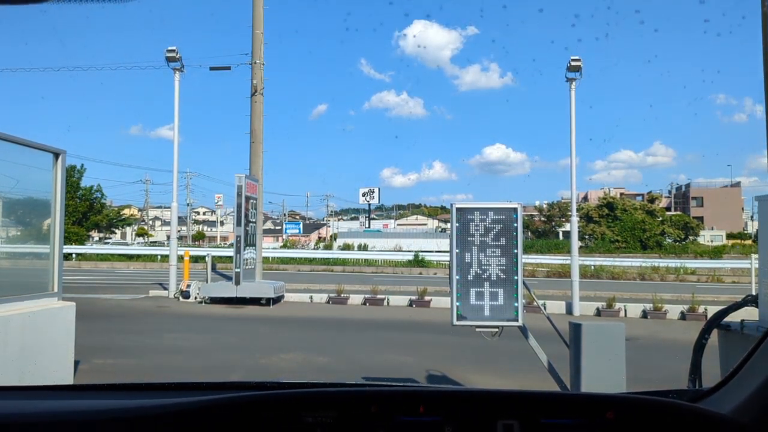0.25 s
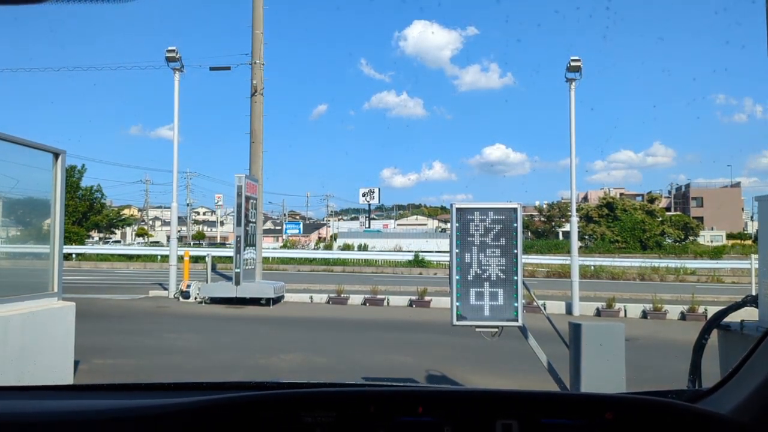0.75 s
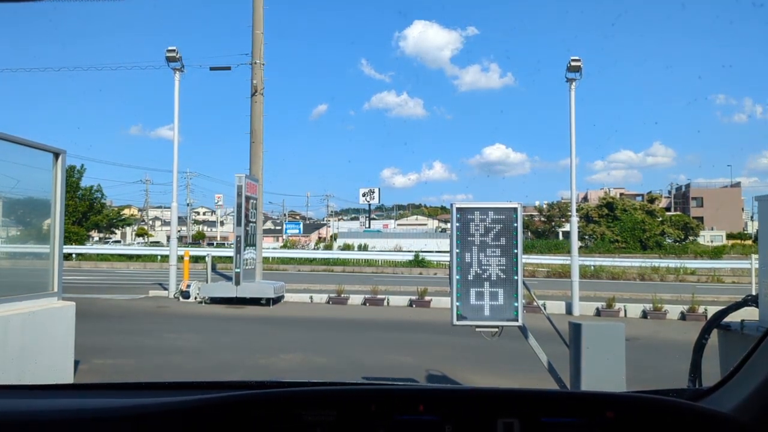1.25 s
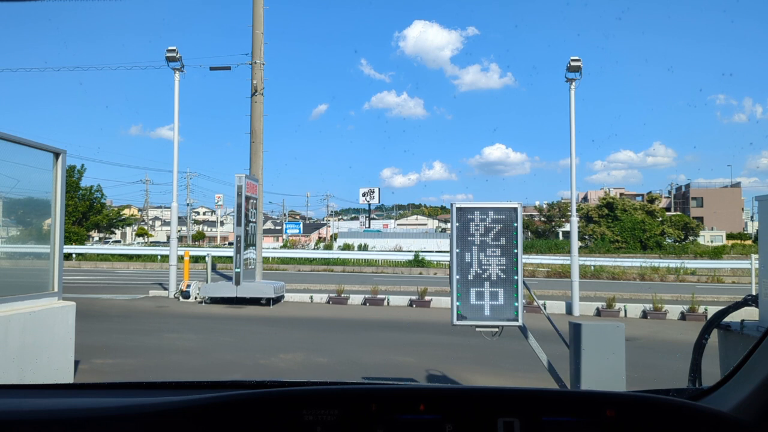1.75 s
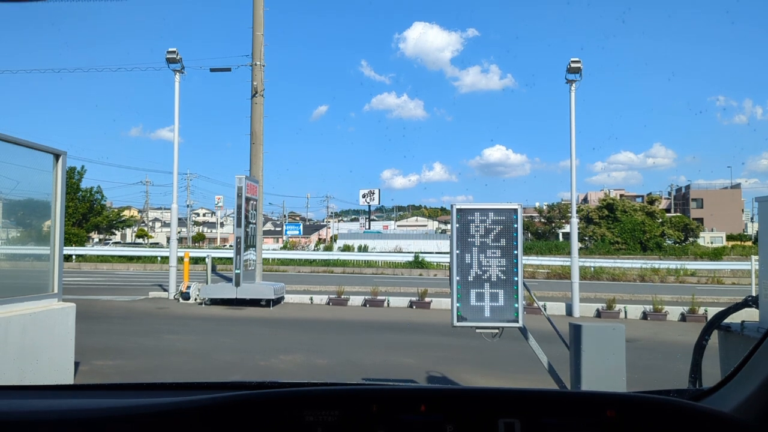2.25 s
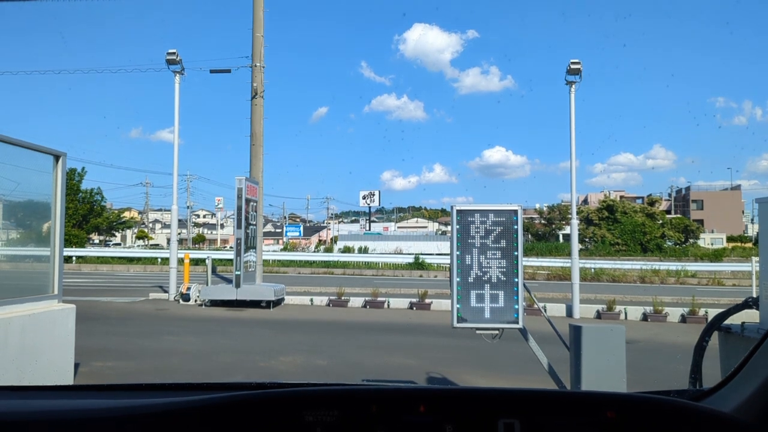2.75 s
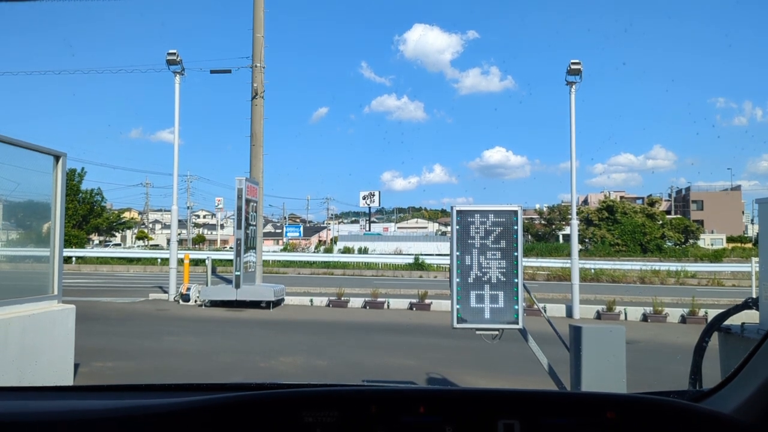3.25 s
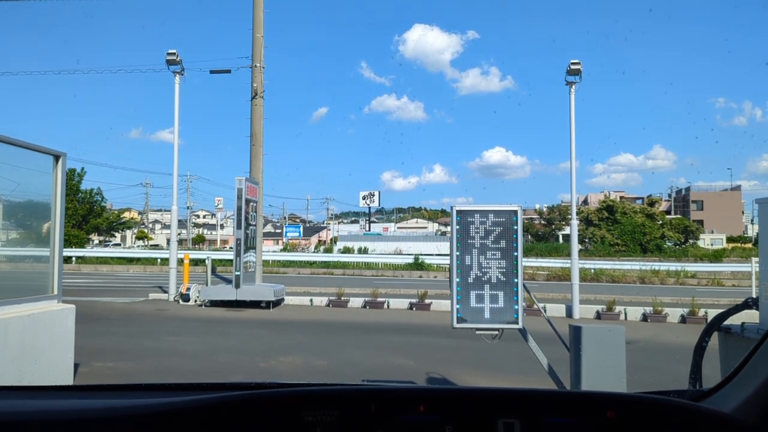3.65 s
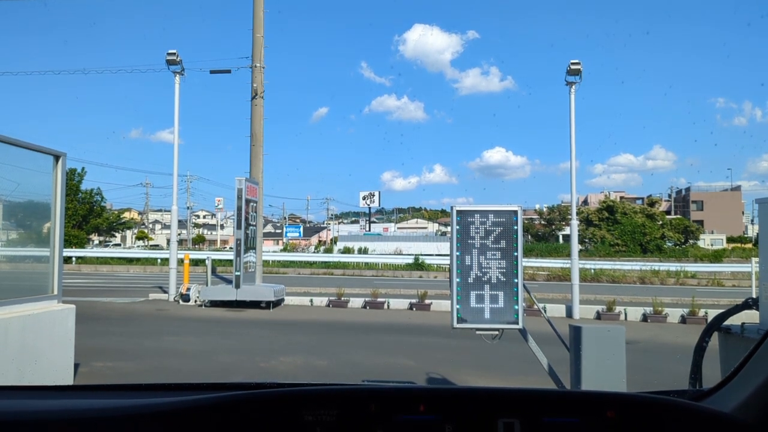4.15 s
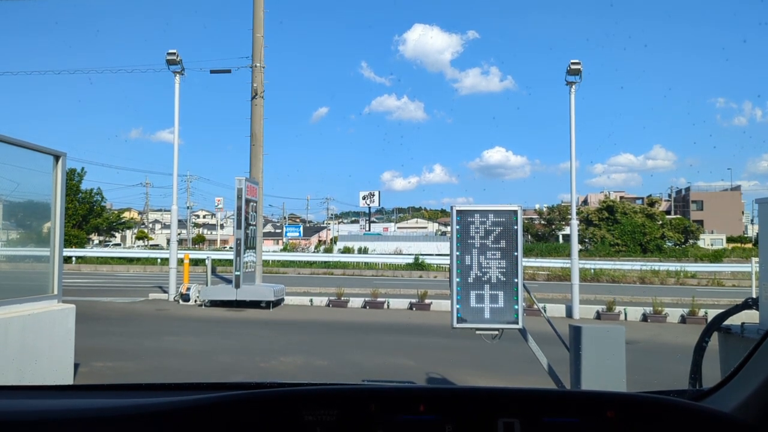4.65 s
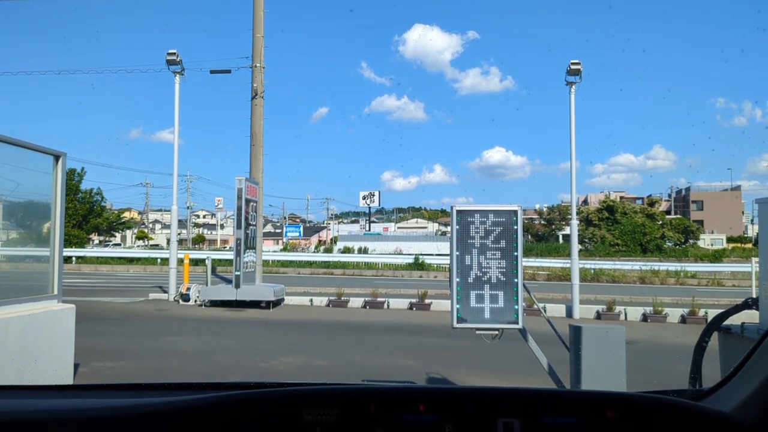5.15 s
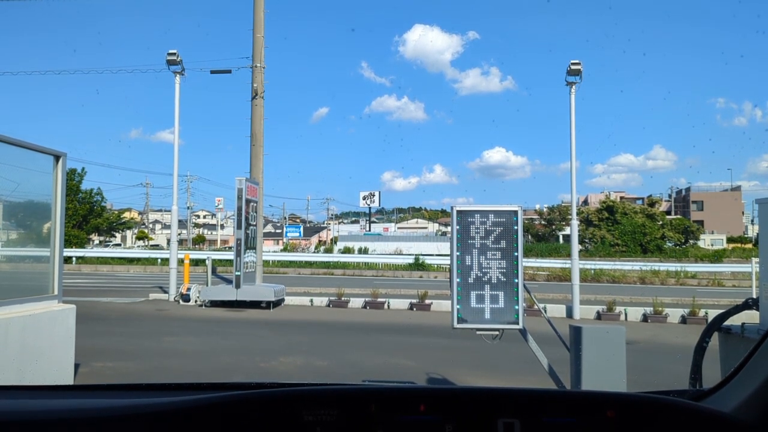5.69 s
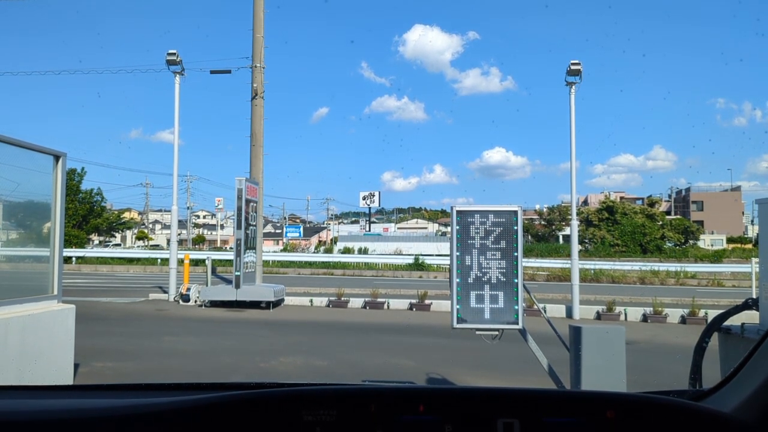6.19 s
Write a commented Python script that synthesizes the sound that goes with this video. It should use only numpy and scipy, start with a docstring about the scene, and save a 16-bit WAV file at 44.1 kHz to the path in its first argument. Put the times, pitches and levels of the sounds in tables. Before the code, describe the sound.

From inside a closed car, the blowers of a car-wash dryer roar without pause for about 6.4 seconds. The sound is mostly low: deep cabin rumble and boomy panel resonance, unsteady with tiny gusts, swells and dips. The deepest part strengthens over the first few seconds, while a hollow mid drone grows slowly throughout. A much quieter hiss of air leaks through glass and seals, its treble toward the right. Faint fan whistles are buried in the drone, and a thin mid-pitched tone wavers in and out, clearest around 0.6 and 5.8-6.1 s. Tiny high ticks of water drops on glass, mostly right, are frequent in the first two seconds, then sparse, with isolated ones near 2.9, 3.4 and 6.1. At about 5.5 s a small slug of water spatters sharply on the glass. The roar continues to the end, in enclosed stereo cabin sound.

```python
"""Car-wash dryer from inside the car

Blower jets shake the panels of a closed car: noise through cabin resonances gives boom and drone.
A thin hiss leaks in, mostly on the right; fan whistles and a wavering tone lie in the drone.
Blown drops tick on the glass as short decaying sines with a crack; a slug of water bursts as wide noise.
"""
import sys
import numpy as np
from scipy import signal
from scipy.fft import rfft, irfft, next_fast_len
from scipy.io import wavfile
from scipy.ndimage import uniform_filter1d, map_coordinates

SR = 44100
rng = np.random.default_rng(int(sys.argv[2]) if len(sys.argv) > 2 else 0)


def generate_wav(sig):
    """Save sig (samples, or channels by samples) to the path in sys.argv[1] as 16-bit PCM at SR."""
    pcm = np.round(np.clip(np.atleast_2d(sig).T, -1, 1) * 32767).astype(np.int16)
    wavfile.write(sys.argv[1], SR, pcm)


N = 283386


def jets():
    """Blower jets: panel-shaken cabin resonances plus the hiss that leaks in."""
    drone_db = glide(first=-41, last=-36, tau_s=15)
    return rumble() + drone(drone_db) + across(drone_db) + hiss()


# lowest air resonances of the cabin: (centre [Hz], width [Hz], relative level [dB], left-right [dB])
DEEP_MODES = [(57.5, 12, -8.5, 2.5), (75, 14, -7.5, 0), (97.9, 21, -1, -3), (107.6, 12.3, 2, -2)]
# roof and door panels: (centre [Hz], width [Hz], relative level [dB], left-right [dB])
BOOM_MODES = [(128.7, 20.2, -0.5, -1), (149.8, 14, -2, -0.5), (166.7, 14.1, -1, -3.5), (197.4, 12, -11, -4)]
# brief swells and dips: (time [s], level [dB], 1/e half-length [s])
LUMPS = [(.785, -9, .016), (1.096, -9, .016), (1.16, 3, .025), (1.336, 5, .025), (2.03, 6, .028),
         (2.078, -8, .014), (2.5, -7, .015), (2.65, -7, .014), (2.69, 5, .025), (2.9, -5, .03),
         (3.13, 4, .03), (3.23, 4, .02), (3.57, -8, .016), (4.09, -7, .014), (4.329, -8, .018),
         (4.58, 4, .03), (4.9, -9, .03), (5.04, -4, .02), (5.11, 3, .03), (5.83, 3, .03)]
GUST_KNOTS_PER_S, GUST_DB = 9, 0.69
BOOM_SWELL_SHARE = 0.46  # share of each swell the panels follow; dips reach them whole


def rumble():
    """Cabin air and panel resonances; levels glide as the jets creep along the body, with random gusts."""
    t_s = np.arange(N) / SR
    lump_db = sum(db * np.exp(-((t_s - at_s) / length_s) ** 2) for at_s, db, length_s in LUMPS)
    panel_lump_db = np.minimum(lump_db, BOOM_SWELL_SHARE * lump_db)
    deep = unit(filtered(turbulence(patchy_db=0.26), resonant(DEEP_MODES, skirt=1.65)))
    boom = unit(filtered(turbulence(patchy_db=-0.55), resonant(BOOM_MODES, skirt=1.52)))
    deep_db = glide(first=-33.5, last=-29, tau_s=2.76) + lump_db + GUST_DB * wobble(GUST_KNOTS_PER_S)
    boom_db = glide(first=-32, last=-34.5, tau_s=1.6) + panel_lump_db + GUST_DB * wobble(GUST_KNOTS_PER_S)
    return amp(deep_db) * deep + amp(boom_db) * boom


# higher resonances: (centre [Hz], width [Hz], relative level [dB], left-right [dB])
DRONE_MODES = [(252, 26.7, -9, 9), (298, 34, -3.5, 0), (328.3, 15.7, -3.5, 3), (354.5, 48, -10.5, 2.5),
               (394, 28, -9.5, -0.5), (470.5, 30, -12.5, -0.5), (494, 13, -10, -0.5), (507.3, 26, -10.5, 2),
               (564, 56, -15.5, -1), (643.4, 28, -18, -5), (745, 68, -16, 1), (809, 20, -17.5, 2.5),
               (837, 25, -20.5, 2), (890, 68, -22.5, 2.5), (1015, 86, -27, 1), (1147, 140, -30, 1),
               (1360, 50, -29.5, 4.5), (1484, 50, -29.5, -1.5)]
LOW_DRONE_HZ = 370


def drone(level_db):
    """Higher cabin resonances; the lowest of them grow faster than the rest."""
    noise = unit(filtered(turbulence(patchy_db=0.72), resonant(DRONE_MODES, skirt=1.43)))
    low = filtered(noise, lambda hz: 1 / (1 + (hz / LOW_DRONE_HZ) ** 20))
    low_over_rest_db = glide(first=-2.7, last=5.9, tau_s=8.8)
    return amp(level_db) * (noise + (amp(low_over_rest_db) - 1) * low)


# side-to-side resonances: (centre [Hz], width [Hz], relative level [dB], left-right [dB])
ACROSS_MODES = [(278, 25, 14.5, 3.5), (604, 63, 6, -2), (680, 64, 8, -1), (791, 54, 9, -3.5),
                (828, 29, 6.5, -3.5), (958, 31, 7, -1), (1103, 43, 1, -0.5), (1100, 50, 0.5, 0.5),
                (1242, 76, 5, 0), (1290, 40, 1, 2), (1390, 35, -2, -1), (1400, 60, -5, 0),
                (1470, 20, -1, 1.5), (1566, 61, -0.5, -4.5), (1643, 80, 0, 1), (1690, 99, -11, -0.5)]
ACROSS_MEAN_DB, DRONE_SHARE = -49.5, 0.55


def across(drone_db):
    """Side-to-side resonances, opposite in sign at the microphones; the drone's panels shake them."""
    noise = unit(filtered(turbulence(patchy_db=-0.3, sign=-1.02), resonant(ACROSS_MODES, skirt=1.5)))
    return amp(ACROSS_MEAN_DB + DRONE_SHARE * (drone_db - drone_db.mean())) * noise


# jet noise through glass and seals: (frequency [Hz], relative density [dB per Hz])
HISS_COLOUR = [(1400, -8.5), (1800, -0.5), (2300, 0), (2800, -2.5), (3500, 0), (4300, -3), (5000, -4.5),
               (5600, -7.5), (6100, -12.5), (7200, -18), (8500, -27.5), (9500, -37.5), (11500, -54.5)]
# hiss balance: (frequency [Hz], left-right [dB])
HISS_SIDE = [(60, -1.5), (120, -2.0), (240, 0.5), (490, 0.5), (1000, 0.5), (2020, -1), (4080, -8),
             (8240, -13.5)]
# slow drift: (time [s], level [dB], level of the top over the rest [dB])
HISS_DRIFT = [(0, 1, 1.5), (.35, 0, 2.5), (.6, 0, 0.5), (.85, .5, 0.5), (1.5, 0, 0.5), (2, .5, 0),
              (2.6, 0.5, -3), (3.2, 1, -2.5), (3.8, 0, 0), (4.15, 1, -2.5), (4.5, 0.5, -1.5), (5.2, .5, 1),
              (5.8, 0.5, 0.5), (6.4, 0.5, 2)]
HISS_DB, HISS_LOW_HZ, TREBLE_HZ = -55.5, 1400, 6800
HISS_LEAD_S = 0.000403  # left microphone first
FLICKER_KNOTS_PER_S, FLICKER_DB = 7, 1.5


def hiss():
    """Jet noise leaking through glass and seals; its level drifts and its top flickers."""
    def leak(hz):
        lead = np.exp(1j * np.pi * HISS_LEAD_S * np.array([hz, -hz]))
        return amp(along(HISS_COLOUR, hz)) * sides(along(HISS_SIDE, hz)) * lead * (hz > HISS_LOW_HZ)

    noise = unit(filtered(turbulence(patchy_db=0.76), leak))
    top = filtered(noise, lambda hz: 1 - 1 / (1 + (hz / TREBLE_HZ) ** 10))
    at_s, *levels_db = np.transpose(HISS_DRIFT)
    drift_db, top_db = (np.interp(np.arange(N) / SR, at_s, db) for db in levels_db)
    top_gain = amp(top_db + FLICKER_DB * wobble(FLICKER_KNOTS_PER_S))
    return amp(HISS_DB + drift_db) * (noise + (top_gain - 1) * top)


# fan whistles: (centre [Hz], width [Hz], first level [dB], last level [dB], time constant [s])
WHISTLES = [(289, 9, -50, -41.5, 9), (326, 9, -62, -49, 4), (510, 10, -54, -54.5, 2), (650, 9, -60, -75, 6),
            (815, 9, -74, -56, 8)]


def whistles():
    """Fan whistles: narrow bands of noise, each gliding towards its own level."""
    out = np.zeros((2, N))
    for hz, width_hz, first_db, last_db, tau_s in WHISTLES:
        band = filtered(turbulence(patchy_db=0.5), resonant([(hz, width_hz, 0, 1)], skirt=1.8))
        out += amp(glide(first_db, last_db, tau_s)) * unit(band)
    return out


# tone comes and goes: (time [s], level [dB])
HUM_LEVEL = [(0, -60), (.6, -49.5), (1.6, -53.5), (2.2, -56.5), (2.7, -54.5), (3.3, -56), (3.8, -61),
             (4.5, -54.5), (5.2, -64.5), (5.75, -49.5), (6.15, -50.5), (6.4, -61)]
HUM_HZ, HUM_WANDER_HZ, HUM_WANDER_DB, HUM_KNOTS_PER_S = 422, 0.6, 0.62, 4
HUM_LEAD_RAD = 1.2  # left ahead of right


def hum():
    """Thin tone, probably fan blades: a sine of slowly wavering pitch and strength."""
    level_db = np.interp(np.arange(N) / SR, *np.transpose(HUM_LEVEL))
    hz = HUM_HZ + HUM_WANDER_HZ * wobble(HUM_KNOTS_PER_S)
    phase = 2 * np.pi * np.cumsum(hz) / SR
    tone = np.sqrt(2) * np.sin(phase + np.array([[HUM_LEAD_RAD], [0]]))
    return amp(level_db + HUM_WANDER_DB * wobble(HUM_KNOTS_PER_S)) * tone


# bursts of the slug: (time [s], level [dB], t60 [s])
SPLASH = [(5.484, -47, .05), (5.4925, -35.5, .035), (5.501, -39, .035), (5.511, -43.5, .04),
          (5.519, -47, .045)]
# splash colour: (frequency [Hz], relative density [dB per Hz])
SPRAY_COLOUR = [(900, -16), (1600, 3), (2400, -5), (3600, -7), (5000, -3), (6000, -8), (7500, -22),
                (9500, -32), (12500, -34), (13500, -52)]
# splash balance: (frequency [Hz], left-right [dB])
SPRAY_SIDE = [(1600, 1), (5000, -11), (12000, -5)]
SPLASH_RISE_S = 0.0025


def splash():
    """A slug of water thrown against the glass: brief decaying bursts of wide noise."""
    def colour(hz):
        return amp(along(SPRAY_COLOUR, hz)) * sides(along(SPRAY_SIDE, hz))

    out, t_s = np.zeros((2, N)), np.arange(SR // 10) / SR
    for at_s, db, t60_s in SPLASH:
        spray = unit(filtered(rng.standard_normal((2, len(t_s))), colour))
        envelope = amp(db - 60 * t_s / t60_s) * (1 - np.exp(-t_s / SPLASH_RISE_S))
        out[:, round(at_s * SR):][:, :len(t_s)] += envelope * spray
    return out


# single drops: (time [s], tick peak [dB], pitch [Hz], left-right [dB], crack over tick [dB])
DROPS = [(.406, -66, 8600, -13, -1), (.572, -68, 11700, -10, 2), (.650, -70, 8700, -7, 4),
         (.787, -78, 11200, -6, 2), (.810, -57, 7800, -22, -4), (.935, -70, 9150, -10, 3),
         (1.057, -60, 6760, -4, -1), (1.539, -60, 7200, -3, -2), (1.547, -62, 7200, -3, -2),
         (1.755, -67, 8150, -9, 1), (1.857, -65, 7600, -3, -1), (1.894, -64.5, 8400, -7, 3),
         (1.964, -57, 6400, -12, -2), (2.0835, -73, 9700, -8, 6), (2.864, -61, 6900, -15, -1),
         (3.364, -66, 7600, -10, -3), (4.415, -74, 11100, -1.5, 3), (4.663, -74, 9000, 2, 6),
         (5.372, -76, 8000, -7, 5), (6.105, -71, 8500, -7, 8), (6.112, -72, 8500, -7, 8)]
RING_CYCLES = 45  # to -60 dB
TICK_RISE_S, CRACK_RISE_S = 0.00065, 0.0008
CRACK_T60_S, CRACK_WIDTH_HZ = 0.013, 2000
SMEAR_DB, SMEAR_T60_S = -4, 0.03


def drops():
    """Drops on glass: a one-pitch tick plus a tiny noise crack, smeared a little by glass and cabin."""
    out, t_s = np.zeros((2, N + SR)), np.arange(SR // 30) / SR
    for at_s, db, hz, pan_db, crack_db in [*DROPS, *mist()]:
        ring = np.sin(2 * np.pi * hz * t_s) * amp(-60 * t_s * hz / RING_CYCLES)
        tick = ring * (1 - np.exp(-t_s / TICK_RISE_S))
        band = filtered(rng.standard_normal(len(t_s)), lambda f: np.exp(-((f - hz) / CRACK_WIDTH_HZ) ** 2))
        crack = amp(crack_db - 60 * t_s / CRACK_T60_S) * (1 - np.exp(-t_s / CRACK_RISE_S)) * unit(band)
        tail = amp(-60 * t_s / SMEAR_T60_S) * rng.standard_normal((2, len(t_s)))
        tail /= np.linalg.norm(tail[0])
        smear = signal.fftconvolve(tick[None], tail, axes=1)[:, :len(t_s)]
        heard = tick / np.abs(tick).max() + crack + amp(SMEAR_DB) * smear
        out[:, round(at_s * SR):][:, :len(t_s)] += amp(db) * sides(pan_db)[:, None] * heard
    return out[:, :N]


MIST_MIN_DB, MIST_SPREAD_DB, MIST_CRACK_DB = -84, 9, 3


def mist():
    """Rows of faint drops at random moments, pitches and sizes; fewer as the glass dries."""
    rate_per_s = glide(first=20, last=4.3, tau_s=1.4)
    expected = np.cumsum(rate_per_s) / SR
    gap, pitch, size, place = rng.random((200, 4)).T
    due = np.cumsum(-np.log(1 - gap))  # Poisson arrivals, in expected drops
    at_s = np.interp(due, expected, np.arange(N) / SR)
    db = MIST_MIN_DB + MIST_SPREAD_DB * size ** 2
    hz, pan_db = 6500 * 1.5 ** pitch, -14 + 12 * place
    rows = np.transpose([at_s, db, hz, pan_db, np.full_like(due, MIST_CRACK_DB)])
    return rows[due < expected[-1]]


# likeness of the microphones: (frequency [Hz], correlation [0-1])
ALIKE = [(100, 0.97), (230, 1), (330, 0.83), (450, 0.77), (520, 0.85), (620, 0.27), (780, 0.38),
         (1000, 0.48), (1300, 0.89), (1550, 0.77), (1900, 0.42), (2500, 0.18), (3500, 0.12), (5000, 0.042)]


def turbulence(patchy_db, sign=1):
    """Stereo white noise with drifting patches of gain; the microphones share more of it in the bass."""
    z = signal.stft(rng.standard_normal((2, N)), nperseg=1024)[2]
    field = uniform_filter1d(rng.standard_normal(z.shape[1:]), size=12, axis=0)
    field = uniform_filter1d(field, size=6, axis=1)
    pair = signal.istft(z * amp(patchy_db * unit(field)), nperseg=1024)[1][:, :N]

    def mid_side(hz):
        turn = np.arccos(np.clip(along(ALIKE, hz), 0, 1)) / 2
        return np.array([np.cos(turn), np.sin(turn)])

    mid, side = filtered(pair, mid_side)
    return np.array([mid + side, sign * (mid - side)])


def resonant(modes, skirt):
    """Response of many independently shaken resonances: their powers add."""
    def response(f):
        power = 0
        for hz, width_hz, db, pan_db in modes:
            gains = amp(db) * sides(pan_db)[:, None]
            detune = (f - hz * hz / (f + 1)) / width_hz
            power = power + gains ** 2 * (1 + detune ** 2) ** -skirt
        return np.sqrt(power)
    return response


def glide(first, last, tau_s):
    """A value settling exponentially from first towards last."""
    return last + (first - last) * np.exp(-np.arange(N) / SR / tau_s)


def wobble(knots_per_s):
    """Smooth random curve: a spline over random knots."""
    return map_coordinates(rng.standard_normal(200), [np.arange(N) * knots_per_s / SR])


def filtered(x, response):
    """x times a response of frequency [Hz]."""
    m = next_fast_len(x.shape[-1] + 8192)
    return irfft(rfft(x, m) * response(np.fft.rfftfreq(m, 1 / SR)), m)[..., :x.shape[-1]]


def along(points, hz):
    """(Hz, value) points interpolated on a log frequency axis."""
    f, v = np.transpose(points)
    return np.interp(np.log(hz + 1), np.log(f + 1), v)


def sides(pan_db):
    """Left and right gains for a level difference."""
    return amp(np.array([pan_db / 2, -pan_db / 2]))


def amp(db):
    """Gain of a level in dB."""
    return 10 ** (np.asarray(db) / 20)


def unit(x):
    """x at rms 1."""
    return x / np.sqrt(np.mean(x ** 2) + 1e-20)


def scene():
    """All that reaches the two microphones."""
    return jets() + whistles() + hum() + splash() + drops()


# microphone hiss: (frequency [Hz], relative density [dB per Hz])
SELF_NOISE_COLOUR = [(3000, 6), (9000, -6), (13000, 1), (15000, -1), (16000, 1)]
SELF_NOISE_DB, SELF_NOISE_LOW_HZ = -80, 3000
LOW_CUT_HZ, TOP_HZ = 30, 15720


def record(dry):
    """Microphones add faint hiss; the deepest bass and all above the band limit are cut."""
    def own_colour(hz):
        return amp(along(SELF_NOISE_COLOUR, hz)) * (hz > SELF_NOISE_LOW_HZ)

    def band(hz):
        x = (hz / LOW_CUT_HZ) ** 6
        return x / (1 + x) * (hz < TOP_HZ)

    own = unit(filtered(rng.standard_normal((2, N)), own_colour))
    pad = SR // 10  # no click at the ends
    heard = np.pad(dry + amp(SELF_NOISE_DB) * own, [(0, 0), (pad, pad)], "reflect")
    return filtered(heard, band)[:, pad:][:, :N]


dry = scene()
out = record(dry)
generate_wav(out)
```